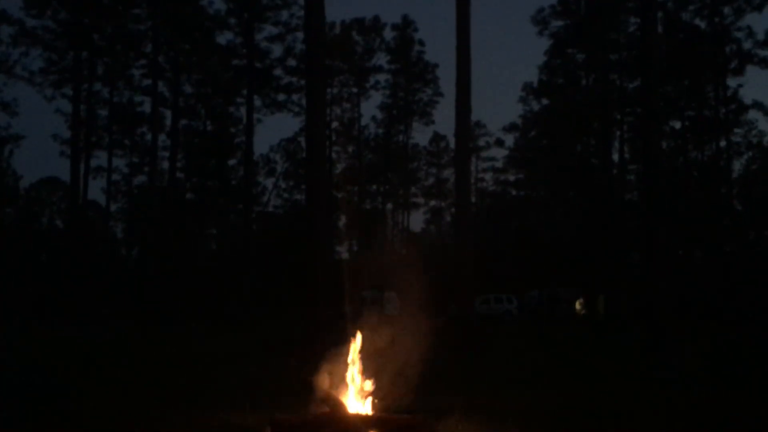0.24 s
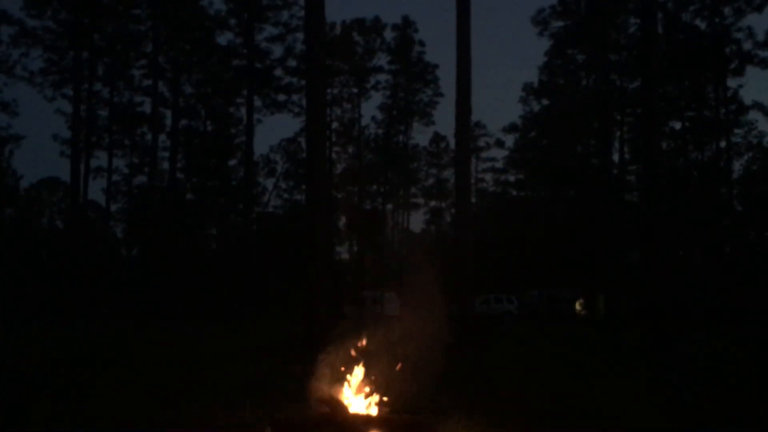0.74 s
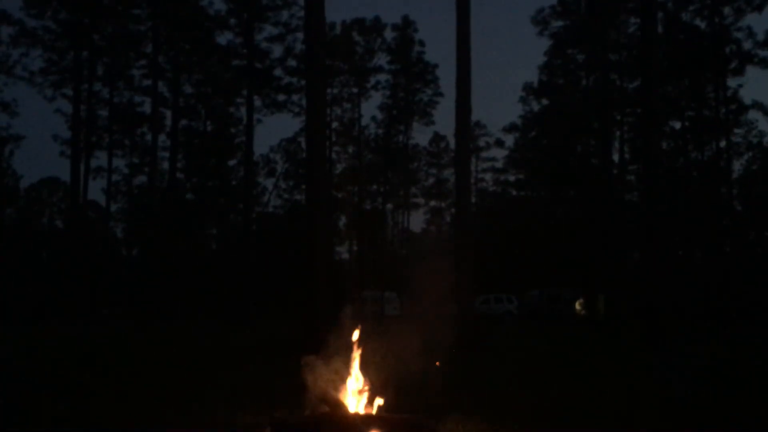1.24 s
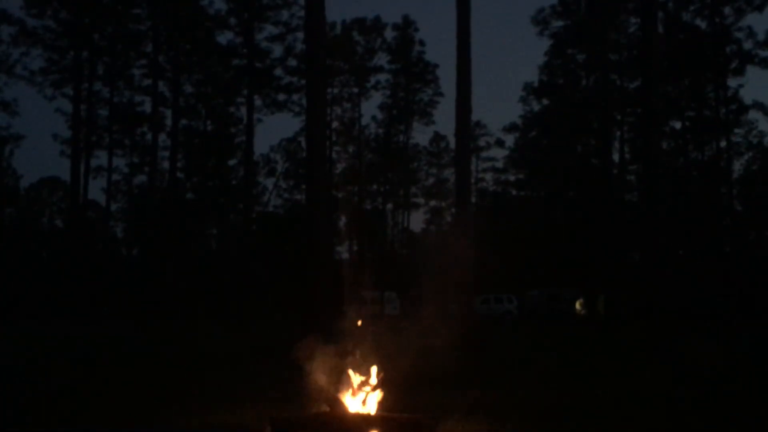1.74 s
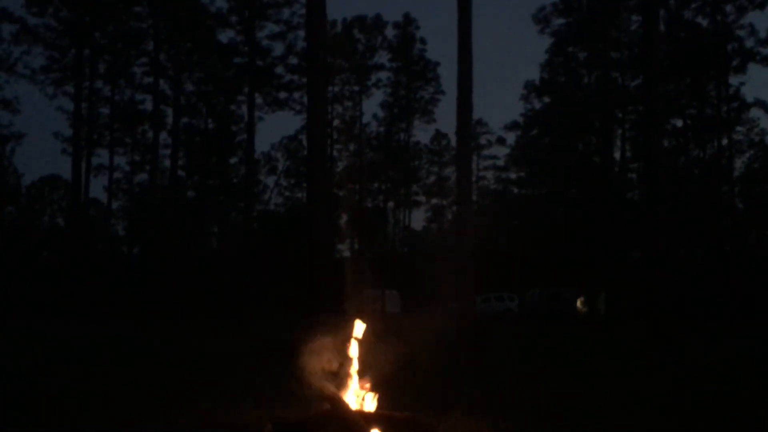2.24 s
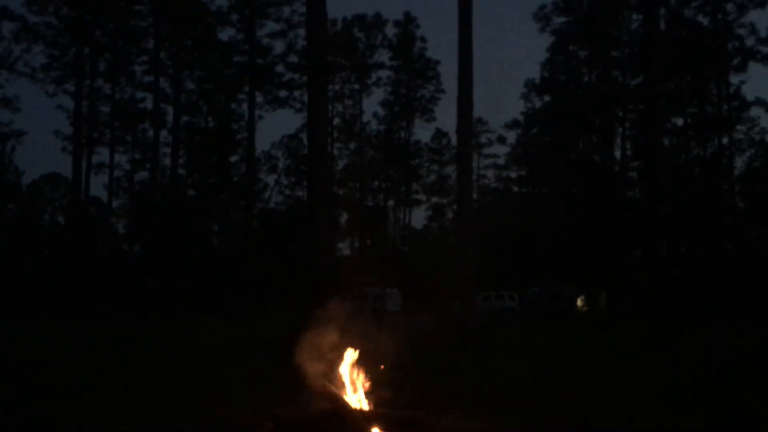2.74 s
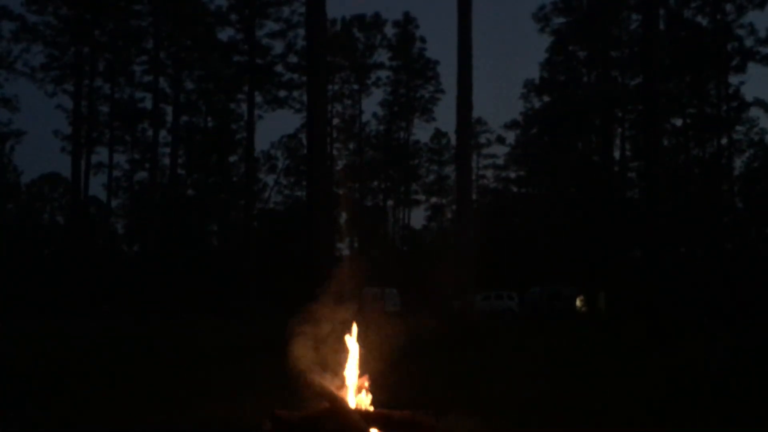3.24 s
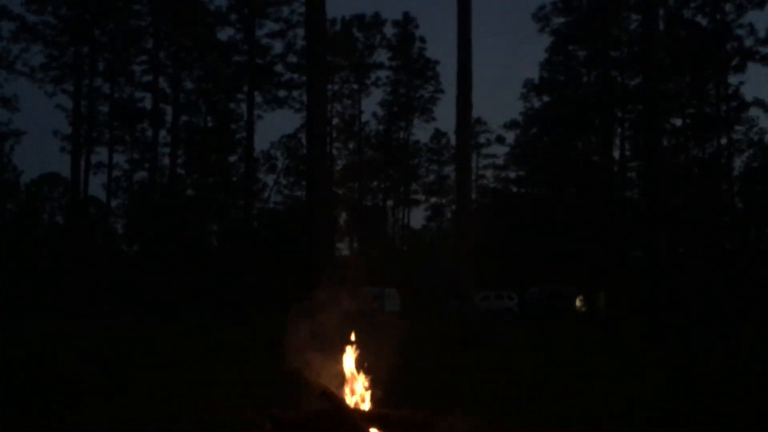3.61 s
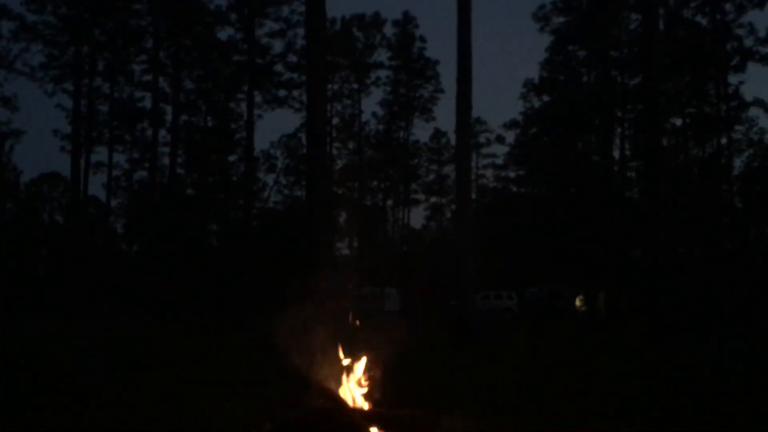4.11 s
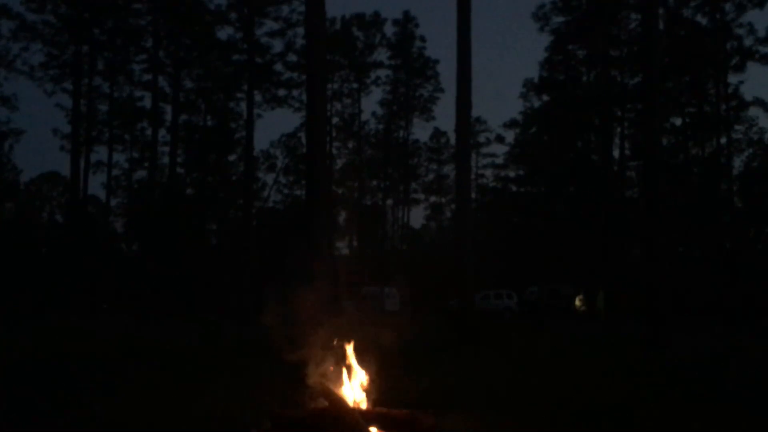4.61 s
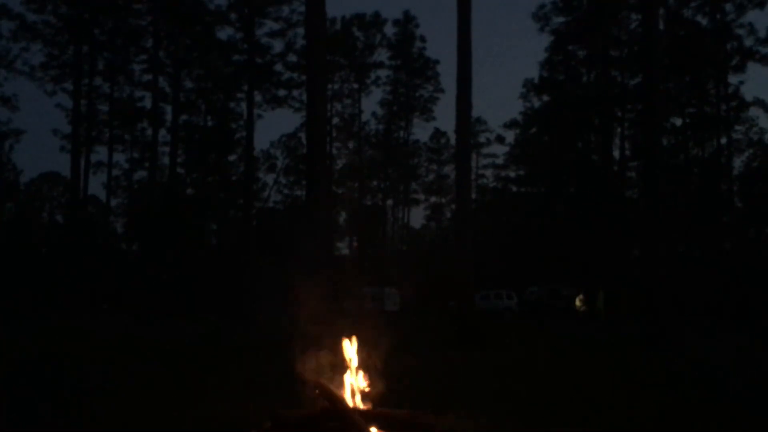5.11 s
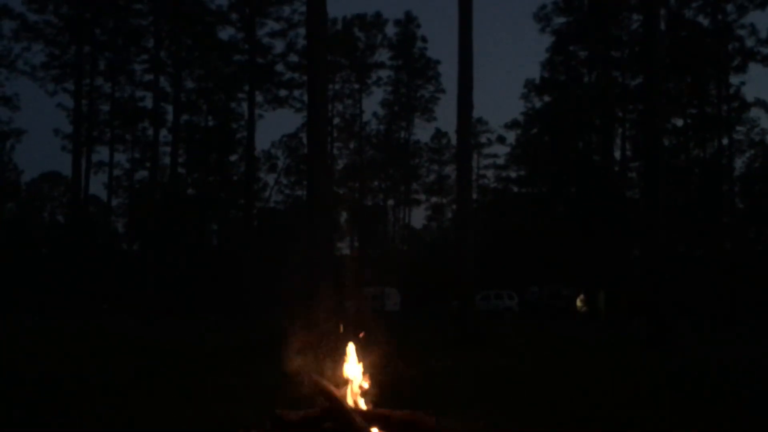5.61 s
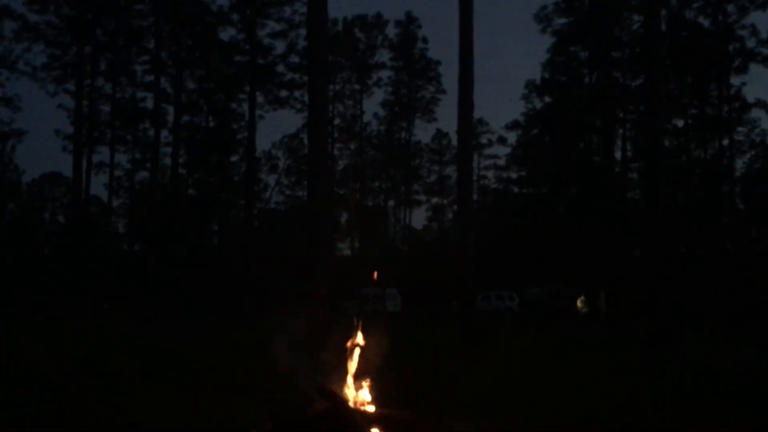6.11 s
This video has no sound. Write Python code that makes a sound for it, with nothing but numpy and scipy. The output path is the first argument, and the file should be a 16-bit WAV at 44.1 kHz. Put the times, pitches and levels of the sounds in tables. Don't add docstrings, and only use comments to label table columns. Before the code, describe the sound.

Small wood campfire snaps and pops irregularly in a dusk pine forest, over a steady high insect trill and a faint low machine hum.

```python
import sys
import numpy as np
from scipy import signal
from scipy.io import wavfile
from scipy.ndimage import uniform_filter1d

SR = 44100
rng = np.random.default_rng(int(sys.argv[2]) if len(sys.argv) > 2 else 0)


def makeup_ratio(level_db):
    decades = np.asarray(level_db, float) / 20
    return 10 ** decades


def pcm_store(signal):
    levels = np.round(np.clip(np.atleast_2d(signal), -1, 1) * 32767)
    wavfile.write(sys.argv[1], SR, levels.astype(np.int16).T)


N = 280476
TIME = np.arange(N) / SR

# (time [s], crack level near 2 kHz [dB], treble level [dB])
DULL_SNAPS = [(.2003, -10.5, -10.5), (.3387, -16, -28), (.4035, -21, -32), (.4197, -9.5, -18),
              (.5399, -14, -17), (1.3401, -14, -16), (1.3653, -20, -33), (1.4679, -18, -36),
              (2.1802, -8, -23), (2.7593, -5, -5.5), (.6751, -19, -15), (3.191, -11.5, -17),
              (3.6266, -18, -34), (3.8503, -14, -23), (3.8561, -15, -15), (3.8775, -4.5, -3.5),
              (3.9697, -18, -11), (4.05, -16, -27), (4.471, -16, -23), (4.6424, -19, -27),
              (4.6605, -12, -14), (4.947, -17, -30), (5.1636, -16, -32), (5.4827, -8.5, -7),
              (5.7559, -17, -32), (5.7685, -9, -20), (5.901, -16, -34), (6.1195, -5.5, -14),
              (6.2927, -4, -22)]
EVEN_SNAPS = [(.1293, -24, -18), (.3022, -20, -32), (.3191, -16, -28), (.3755, -21, -32), (.4648, -9, -15),
              (.6527, -17, -24), (2.647, -16, -23), (2.9409, -12, -21), (1.488, -7, -17),
              (1.6764, -23, -25), (1.697, -23, -34), (1.9674, -15, -34), (2.0371, -15, -13),
              (2.2929, -22, -27), (2.7347, -27, -25), (3.218, -17, -32), (3.4412, -16, -21),
              (3.4875, -20, -30), (3.586, -18, -20), (3.678, -19, -32), (3.7115, -23, -34),
              (4.9872, -12, -21), (5.06, -19, -28), (5.198, -21, -34), (5.2942, -29, -25),
              (5.2859, -28, -24), (5.2884, -34, -21), (5.833, -19, -33), (6.3342, -16, -22)]
SHARP_SNAPS = [(.4895, -11, -11), (.5234, -9, -8.5), (1.1406, -27, -12.5), (1.9831, -38, -29),
               (2.6234, -5.5, -19), (3.1846, -33, -19), (3.8723, -13, -18), (4.5239, -17, -24),
               (3.1498, -30, -25), (3.4522, -28, -23), (4.4217, -32, -23), (5.0364, -9, -15),
               (5.4572, -23, -15)]
DEEP_SNAPS = [
    (1.2553, -14, -22),
    (4.0073, -15, -14),
    (4.4406, -19, -24),
    (5.2842, -12, -11),
    (5.6503, -21, -27),
    (6.0205, -21, -36),
]
# (thump under the crack [dB], treble shape at the three upper SNAP_HZ [dB] x 3)
DULL_COLOUR = (-16.5, -0.8, -4.5, -16)
EVEN_COLOUR = (-12.5, 0, -1.5, 1)
SHARP_COLOUR = (-16, -5.5, 0, -9)
DEEP_COLOUR = (-1, -1, -0.5, 4)
SNAP_HZ = (1250, 2100, 6500, 10000, 14500)
# (time [s], level [dB], pitch [Hz], length [s])
LOG_KNOCKS = [(4.114, -29, 560, .005), (4.121, -34, 200, .012), (4.128, -37, 290, .025),
              (4.122, -43, 580, .016), (4.148, -46, 570, .016), (4.184, -47, 640, .016),
              (4.212, -50, 680, .012), (4.23, -49, 520, .014), (4.255, -46, 600, .02),
              (4.275, -49, 660, .014), (4.135, -47, 720, .014), (4.238, -31, 65, .04), (2.58, -39, 68, .1),
              (6.03, -37, 62, .15), (6.25, -39, 62, .1)]
FIZZ_PER_S, FIZZ_DB = 33, -47

# (time [s], level [dB])
CRICKET_LEVEL = [(0.0, -47.5), (0.28, -45), (0.46, -44.5), (0.78, -42.5), (1.57, -44), (1.74, -41),
                 (1.95, -43), (2.23, -43.5), (2.83, -39), (3.08, -42), (3.74, -43), (4.04, -40.5),
                 (4.8, -42), (4.96, -44), (5.23, -44.5), (5.6, -41), (6.36, -42)]
CRICKET_HZ, CRICKET_SPREAD_HZ, STROKES_PER_S = 3062.4, 55, 67

# (time [s], click rate [1/s], level [dB])
FADING_SONG = [
    (0, 325.3, -51),
    (.7, 326.2, -54),
    (1.4, 328, -53.5),
    (2, 328, -55.5),
    (2.7, 328, -55.5),
    (3.2, 319.5, -57.5),
    (3.7, 318.3, -58.5),
    (4.2, 313, -62),
]
SLOWING_SONG = [
    (0, 336, -60.5),
    (.8, 336, -61),
    (1.6, 337, -62),
    (2.4, 338, -62),
    (3.4, 339, -63),
    (3.8, 325, -65),
    (4.4, 298, -67),
    (5.2, 266, -70),
    (5.6, 250, -85),
]
RISING_SONG = [
    (2.9, 314, -80),
    (3.4, 312.5, -60),
    (4, 311, -56),
    (4.6, 310.4, -56.5),
    (5.2, 310.2, -56),
    (5.8, 309.6, -57.5),
    (6.36, 309.4, -59),
]
# (frequency [Hz], width [Hz], level [dB])
FADING_BODY = [(4060, 280, 1), (4590, 285, 3), (11610, 1140, -3.5), (12770, 1000, -3), (13700, 1100, -12),
               (15200, 960, -13.5)]
SLOWING_BODY = [(8790, 1000, 4), (9740, 370, -3.5)]
RISING_BODY = [(3870, 110, -5), (4030, 110, -2), (4500, 110, -2), (11600, 800, -9), (12450, 750, -.5),
               (13300, 300, -10)]

# (start [s], length [s], pitch [Hz], level [dB])
CLEAR_NOTES = [(.15, .1, 4440, -47), (.505, .15, 4485, -46), (.62, .27, 4455, -46), (.86, .17, 4445, -49),
               (1.05, .08, 4450, -51), (1.17, .11, 4415, -50), (1.32, .22, 4430, -51),
               (1.59, .13, 4405, -51), (1.81, .14, 4430, -51), (2.06, .11, 4400, -55),
               (2.23, .13, 4420, -52), (2.4, .12, 4395, -53), (5.53, .19, 3860, -52),
               (5.76, .11, 3880, -54), (5.88, .16, 3870, -53), (6.1, .09, 3850, -53),
               (6.23, .12, 3865, -52)]
NOTE_SAG_HZ_PER_S, NOTE_EDGE_S = 150, .02
WHINE_HZ, WHINE_DB = 5236, -75
# (pitch [Hz], stroke rate [1/s], level [dB])
CHIRP = (5260, 86, -51)
CHIRP_CORNERS = (.565, .59, .67, .695)

# (frequency [Hz], density [dB per Hz])
CHORUS_SPECTRUM = [(2620, -23), (2820, -5.5), (3300, -11), (3910, -2), (4550, -3.5), (5040, -12),
                   (5720, -14), (7130, -19), (8660, -13), (10400, -24.5), (12400, -16), (13500, -23),
                   (14100, -35), (15200, -26.5)]
# (time [s], level [dB])
CHORUS_LEVEL = [
    (0, -44.5),
    (1, -45.5),
    (4.8, -46),
    (6.36, -48),
]
FOREST_T60, FOREST_DB = 0.97, -11.5

# (frequency [Hz], density [dB per Hz])
RUMBLE_SPECTRUM = [(30, -40), (44, -23), (64, 2), (108, -6), (157, 0), (323, -4.5), (390, -10.5),
                   (446, -15.5), (593, -19.5), (758, -29), (1200, -33.5), (2600, -31.5), (3400, -29),
                   (5700, -88)]
RUMBLE_DB = -42.5
# (frequency [Hz], waver [Hz], level [dB])
HUM_LINES = [(56.6, 0.99, -51), (61.2, 1.09, -53.5), (42.6, 1.95, -63), (117.2, 2, -59), (141.7, 1.96, -58),
             (165.2, 1.77, -60), (328, 4.85, -57), (398, 1.37, -56), (481.5, 1.5, -72), (599, 2.49, -67),
             (684, 1.7, -77), (713, 2.38, -82)]


def evened(x):
    return x / np.sqrt(np.mean(x ** 2) + 1e-20)


def columns(rows):
    s, *values = np.transpose(rows)
    return [np.interp(TIME, s, v) for v in values]


def add(mix, s, sound):
    part = mix[round(s * SR):][:len(sound)]
    part += sound[:len(part)]


def drift(per_s):
    knots = rng.standard_normal(4000)
    return np.interp(TIME * per_s, np.arange(len(knots)), knots) * np.sqrt(3 / 2)


def tone(hz):
    return np.sqrt(2) * np.sin(2 * np.pi * np.cumsum(hz) / SR)


def snap(colour_db):
    hz = np.abs(np.fft.fftfreq(1024, 1 / SR)) + 1
    low, crack, *treble = colour_db
    knots_hz = [300, SNAP_HZ[0], SNAP_HZ[1], 4000, *SNAP_HZ[2:], 20000]
    middle = .5 * (crack + treble[0]) + 0.27
    knots_db = [low - 22, low, crack, middle, *treble, treble[-1] - 6]
    log_gain = np.interp(np.log(hz), np.log(knots_hz), knots_db) * np.log(10) / 20
    spike = np.fft.ifft(np.exp(np.conj(signal.hilbert(log_gain)))).real[:512]
    t = TIME[:400]
    scatter = rng.standard_normal(len(t)) * .075 * makeup_ratio(-60 * t / .01) * (t > .0002)
    scatter[0] = 1
    return np.convolve(spike, scatter / np.linalg.norm(scatter))


def fire():
    out = np.zeros(N)
    kinds = ((DULL_SNAPS, DULL_COLOUR), (EVEN_SNAPS, EVEN_COLOUR),
             (SHARP_SNAPS, SHARP_COLOUR), (DEEP_SNAPS, DEEP_COLOUR))
    for rows, (thump_db, *shape_db) in kinds:
        for s, crack_db, treble_db in rows:
            add(out, s, snap([crack_db + thump_db, crack_db, *np.add(treble_db, shape_db)]))
    for s, db, hz, length in LOG_KNOCKS:
        t = TIME[:round(length * SR)]
        add(out, s, makeup_ratio(db) * np.sin(2 * np.pi * hz * t) * np.hanning(len(t)))
    for colour_db in 5 * rng.standard_normal((8, len(SNAP_HZ))) + [-12, 0, -4, -6, -9]:
        size_db = FIZZ_DB + 3.7 * np.minimum(rng.exponential(1, N), 2)
        bursts = rng.random(N) < FIZZ_PER_S / 8 / SR
        out += signal.oaconvolve(makeup_ratio(size_db) * bursts, snap(colour_db))[:N]
    return out


def forest(x):
    t = TIME[:SR // 2]
    tail = rng.standard_normal(len(t)) * makeup_ratio(-60 * t / FOREST_T60) * (t > .006)
    return x + makeup_ratio(FOREST_DB) * signal.fftconvolve(x, tail / np.linalg.norm(tail))[:N]


def trill(hz, per_s, duty=0.8):
    stroke = (np.cumsum(per_s * np.ones(N)) / SR + rng.random()) % 1
    swell = np.sin(np.pi * np.minimum(stroke / np.clip(duty, .1, 1), 1))
    sagging_hz = hz * (1 + .02 * (.3 - stroke))
    return swell * np.sin(2 * np.pi * np.cumsum(sagging_hz) / SR)


def crickets(count=12):
    out = np.zeros(N)
    spread = np.sort(rng.standard_normal(100 * count))[50::100]
    for k, (pitch, pace) in enumerate(zip(spread, rng.permutation(spread))):
        far = k != count // 2
        hz = CRICKET_HZ + CRICKET_SPREAD_HZ * pitch + 14 * drift(9) + 30 * drift(70)
        per_s = STROKES_PER_S * (1 + .05 * pace * far + .008 * drift(3.005))
        out += makeup_ratio(-6.0 * far + 2.3 * drift(2.61)) * trill(hz, per_s)
    return makeup_ratio(columns(CRICKET_LEVEL)[0]) * evened(forest(out))


def resonate(x, hz, width):
    turn = np.exp(2j * np.pi * hz * np.arange(len(x)) / SR)
    r = np.exp(-np.pi * width / SR)
    return 2 * (turn * signal.lfilter([(1 - r) ** 2], [1, -2 * r, r * r], x / turn)).real


def cicada(song, body, lag, weak, rough, puff):
    per_s, level_db = columns(song)
    cycles = np.cumsum(per_s / 2 * (1 + .002 * drift(10))) / SR
    clicks, puffs = np.zeros(N + 1), np.zeros(N)
    for strength, late in ((1, 0), (weak, lag)):
        at = np.interp(np.arange(1, cycles[-1] - 1) + late, cycles, np.arange(N))
        whole = at.astype(int)
        clicks[whole] += strength * (1 - at % 1)
        clicks[whole + 1] += strength * (at % 1)
        puffs += strength * np.exp(-((cycles - late) % 1) / puff)
    drive = (1 - rough) * evened(clicks[:N]) + rough * evened(puffs * rng.standard_normal(N))
    rung = np.zeros(N)
    for k, (hz, width, db) in enumerate(body):
        rung += (-1) ** k * makeup_ratio(db) * evened(resonate(drive, hz, width))
    return makeup_ratio(level_db) * rung


def cicadas():
    fading = cicada(FADING_SONG, FADING_BODY, lag=.5, weak=.9, rough=.8, puff=.2)
    slowing = cicada(SLOWING_SONG, SLOWING_BODY, lag=.43, weak=.85, rough=.65, puff=.11)
    rising = cicada(RISING_SONG, RISING_BODY, lag=.44, weak=.85, rough=.5, puff=.08)
    return fading + slowing + rising


def clear_tones():
    out = makeup_ratio(WHINE_DB + 2 * drift(3)) * tone(WHINE_HZ + 6 * drift(6))
    waver_hz, flicker = 22 * drift(18), makeup_ratio(1.8 * drift(30))
    for start, length, hz, db in CLEAR_NOTES:
        t = TIME[:round(length * SR)]
        now = slice(round(start * SR), round(start * SR) + len(t))
        swell = np.clip(np.minimum(t, length - t) / NOTE_EDGE_S, 0, 1) * flicker[now]
        pitch_hz = hz - NOTE_SAG_HZ_PER_S * (t - length / 2) + waver_hz[now]
        add(out, start, swell * makeup_ratio(db) * tone(pitch_hz))
    hz, per_s, db = CHIRP
    ragged = resonate(trill(hz + 280 * drift(1200), per_s, duty=.85), hz, 600)
    return out + np.interp(TIME, CHIRP_CORNERS, [0, 1, 1, 0]) * makeup_ratio(db) * evened(ragged)


def hiss(points, patchy_db):
    frames, hz = N // 512 + 5, np.fft.rfftfreq(2048, 1 / SR)
    a, b, patches = rng.standard_normal((frames, len(hz), 3)).T
    patches = uniform_filter1d(patches, size=14, axis=0)
    patches = evened(uniform_filter1d(patches, size=8, axis=1))
    f, db = np.transpose(points)
    shape_db = np.interp(np.log(hz + 1), np.log(f + 1), db)[:, None]
    z = (a + 1j * b) * makeup_ratio(shape_db + patchy_db * patches)
    return evened(signal.istft(z, nperseg=2048, noverlap=1536)[1][:N])


def far_chorus():
    return makeup_ratio(columns(CHORUS_LEVEL)[0]) * hiss(CHORUS_SPECTRUM, patchy_db=1.54)


def machine():
    lines = np.zeros(N)
    for hz, waver_hz, db in HUM_LINES:
        lines += makeup_ratio(db + 2.82 * drift(4)) * tone(hz + waver_hz * drift(5))
    return makeup_ratio(RUMBLE_DB) * hiss(RUMBLE_SPECTRUM, patchy_db=-0.5) + lines


def scene():
    insects = crickets() + forest(cicadas() + clear_tones()) + far_chorus()
    return (fire() + insects + machine())[None]


def roll_off(x):
    return signal.sosfilt(signal.butter(12, 16660, fs=SR, output="sos"), x)


def record(dry):
    edge = signal.firwin(511, 15760, window=("kaiser", 9), fs=SR)
    limited = signal.oaconvolve(dry, edge[None], "same")
    return roll_off(limited)


dry = scene()
out = record(dry)
pcm_store(out)
```